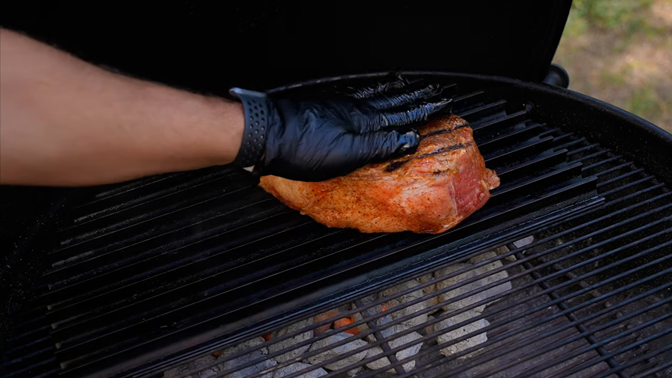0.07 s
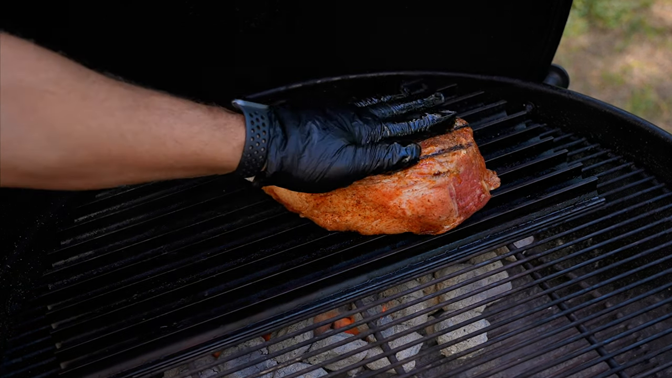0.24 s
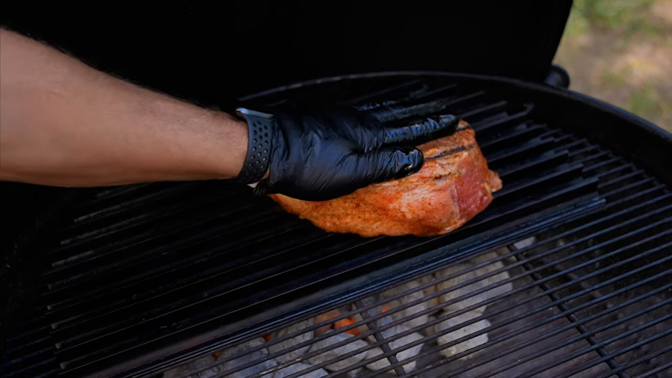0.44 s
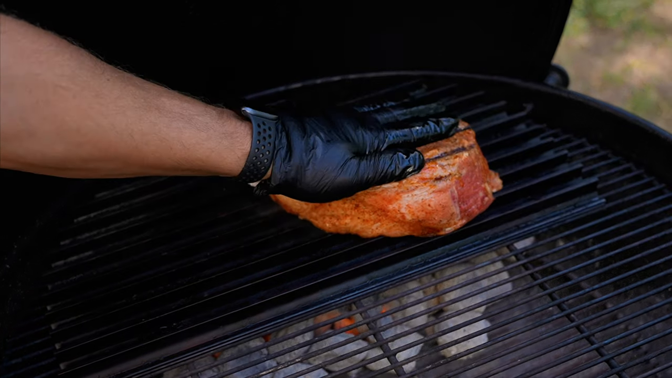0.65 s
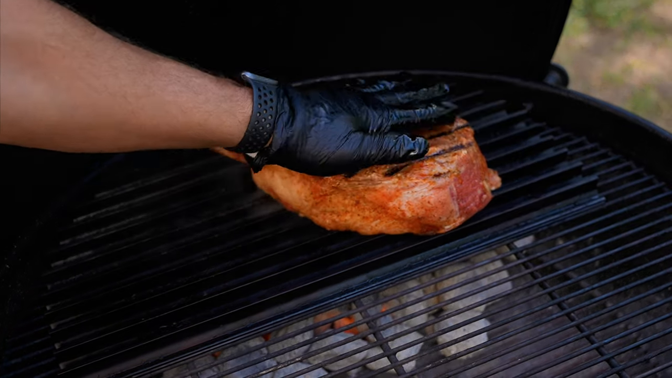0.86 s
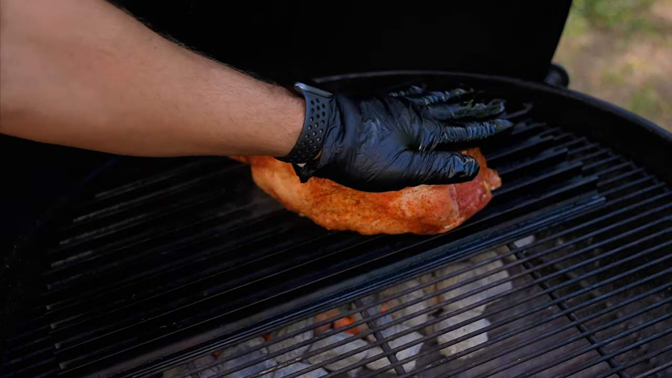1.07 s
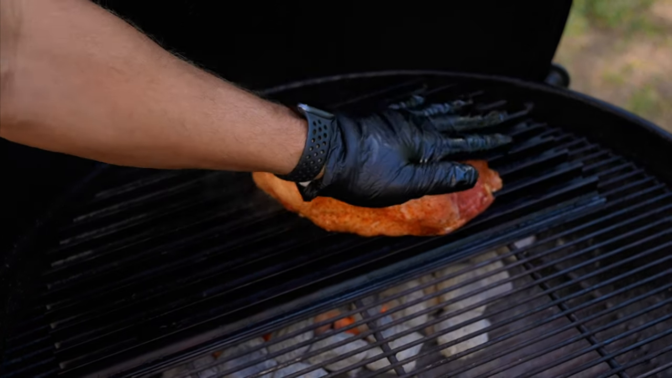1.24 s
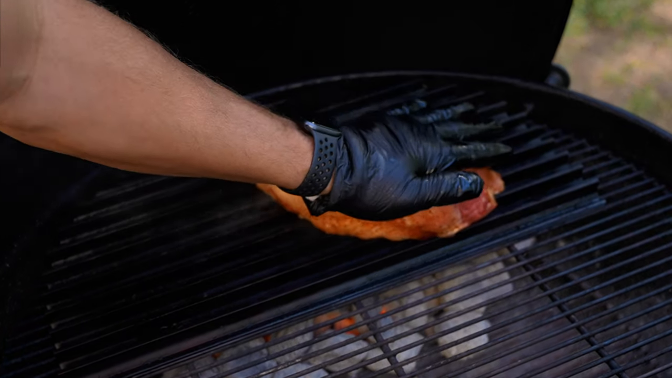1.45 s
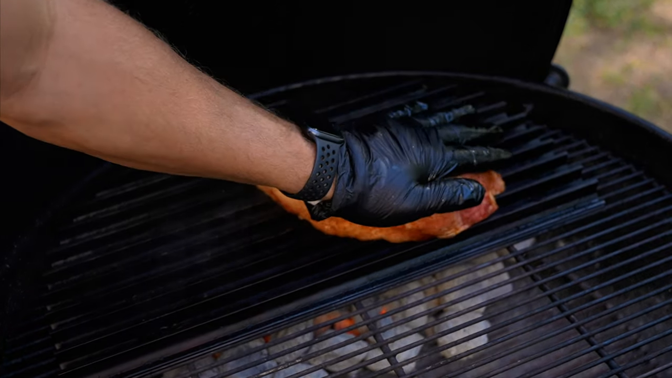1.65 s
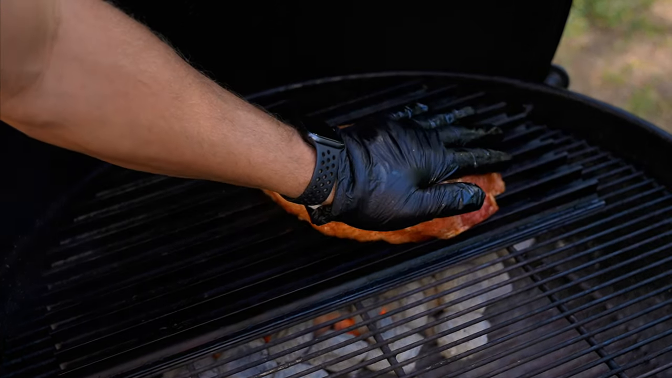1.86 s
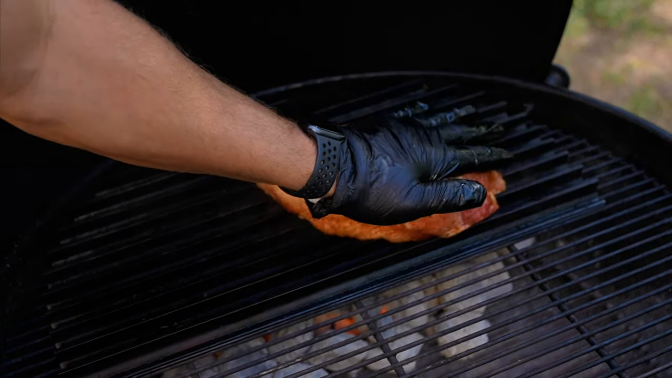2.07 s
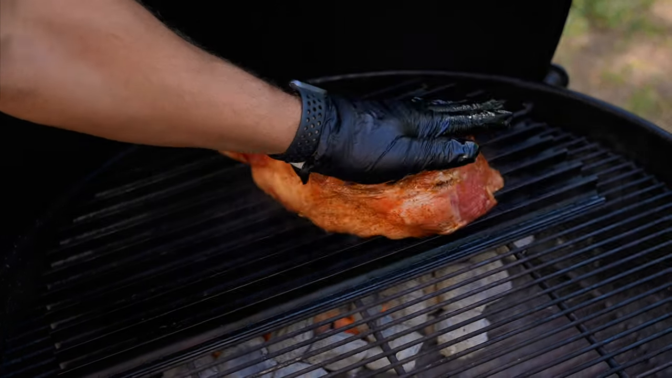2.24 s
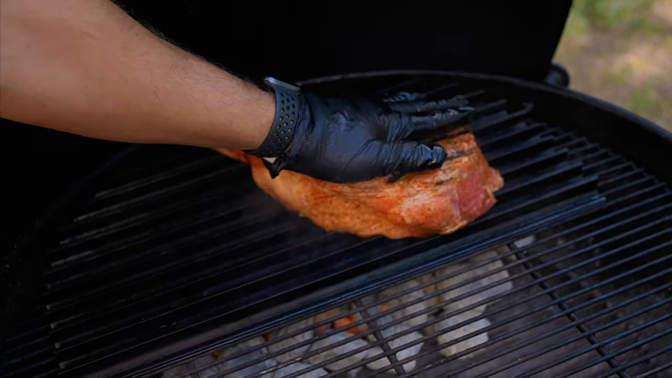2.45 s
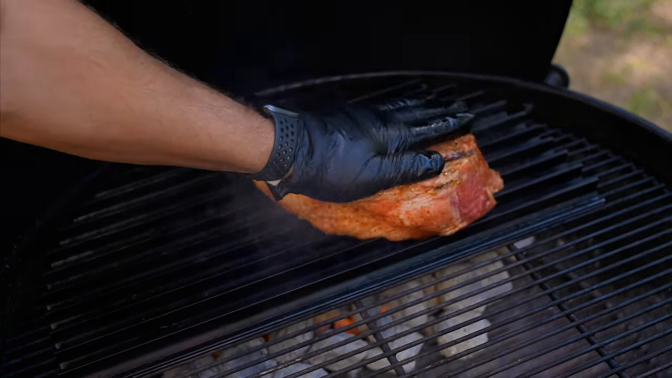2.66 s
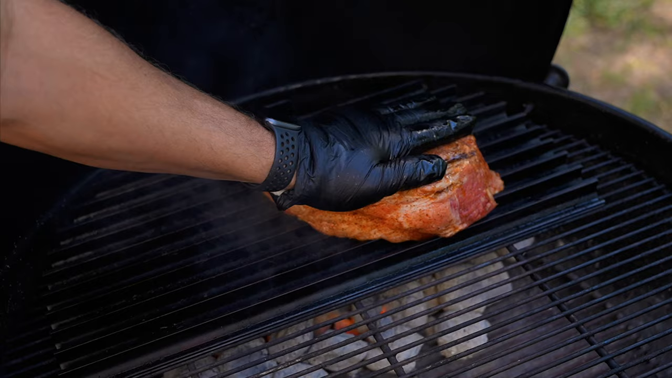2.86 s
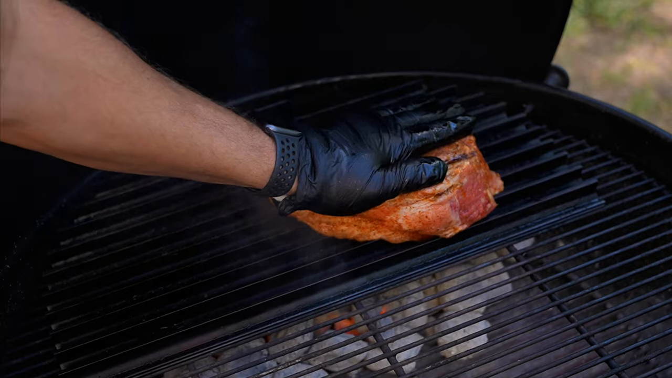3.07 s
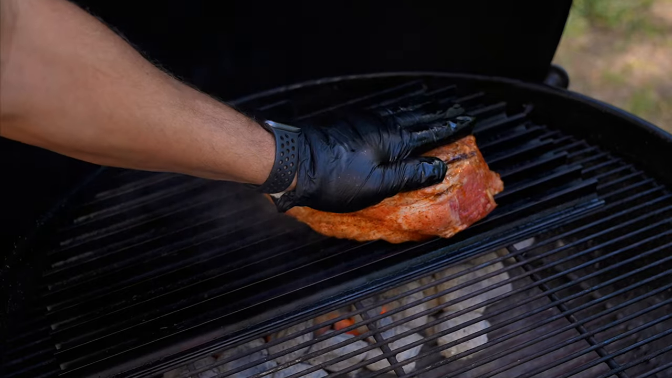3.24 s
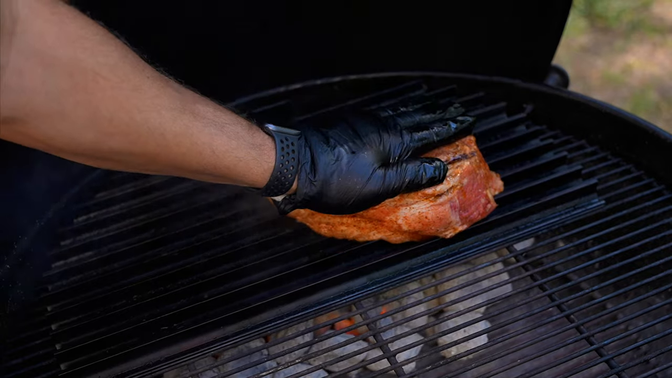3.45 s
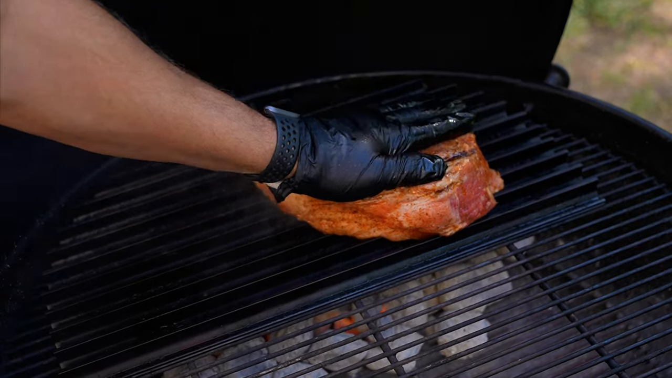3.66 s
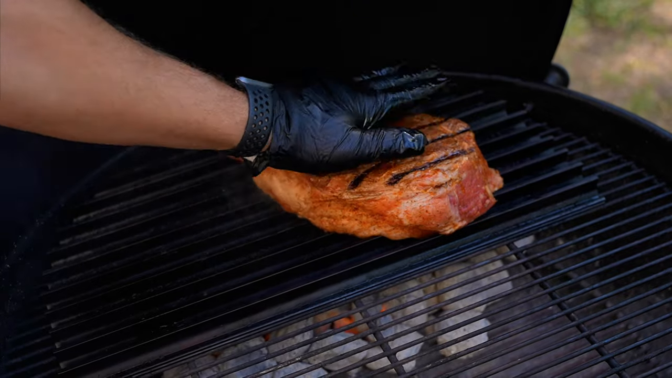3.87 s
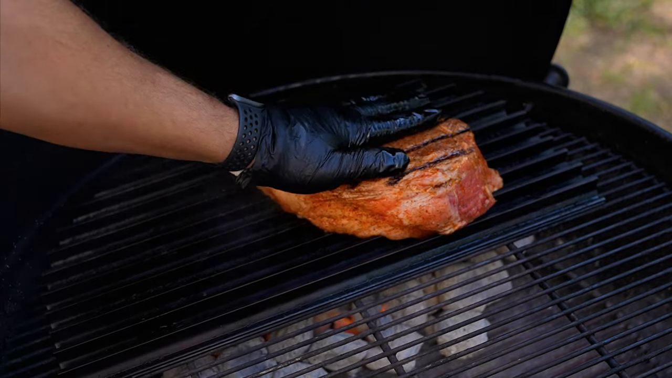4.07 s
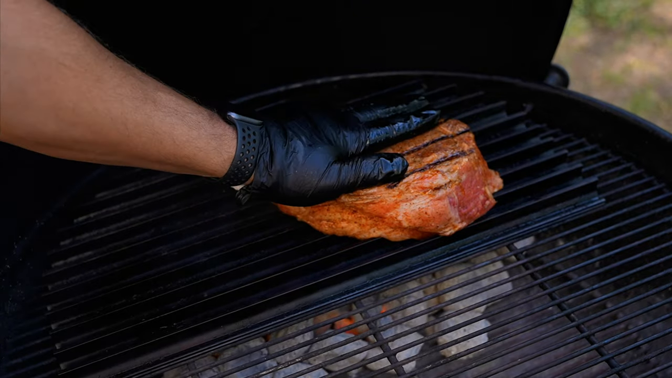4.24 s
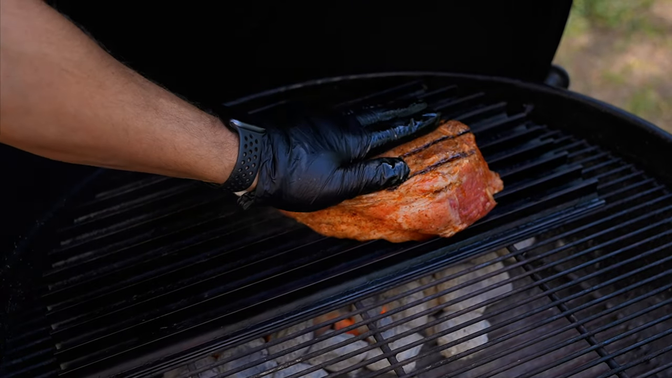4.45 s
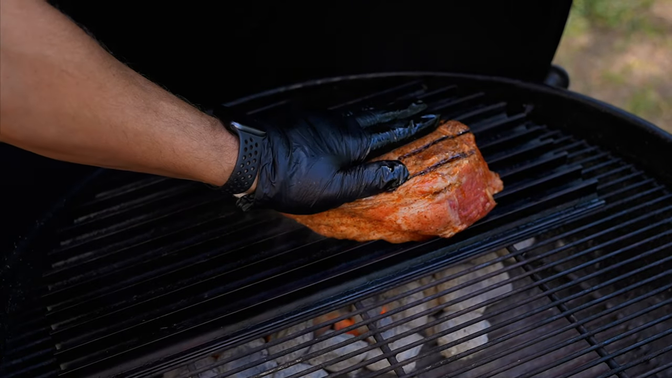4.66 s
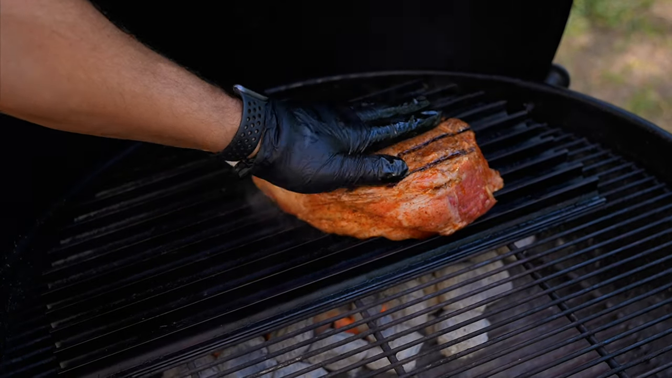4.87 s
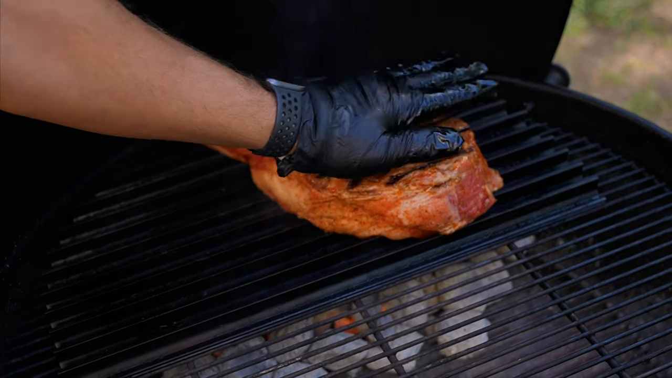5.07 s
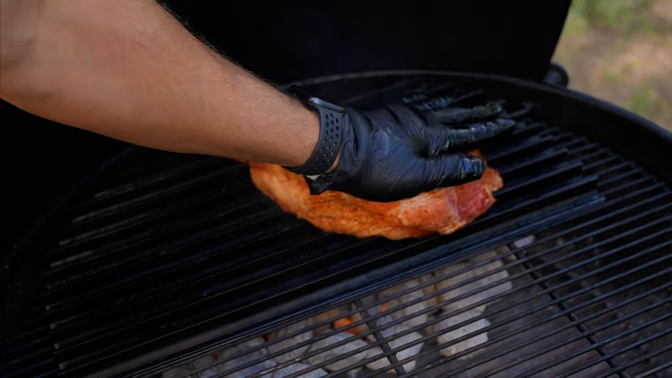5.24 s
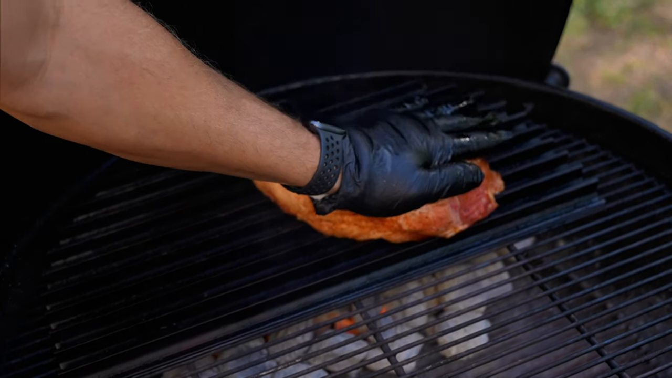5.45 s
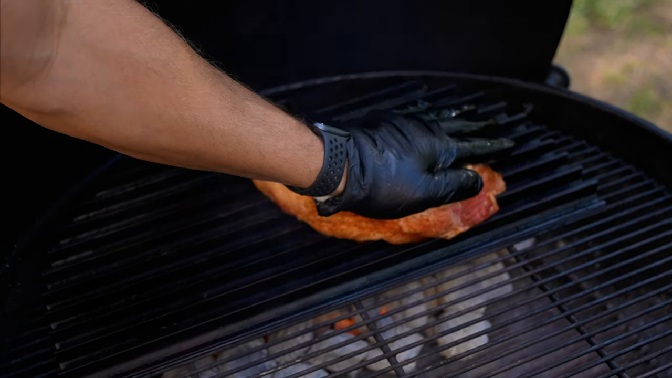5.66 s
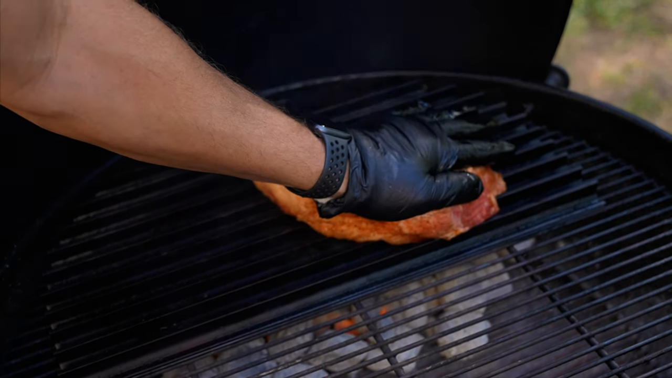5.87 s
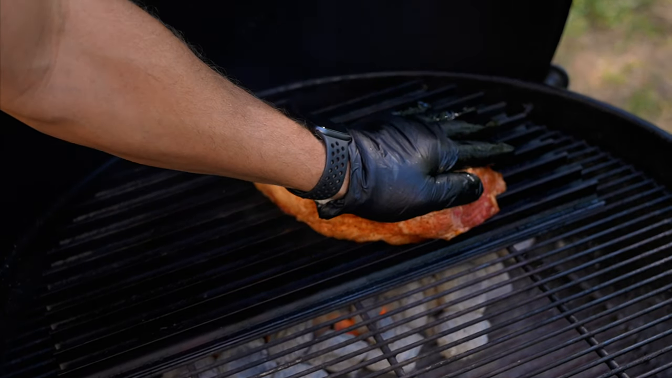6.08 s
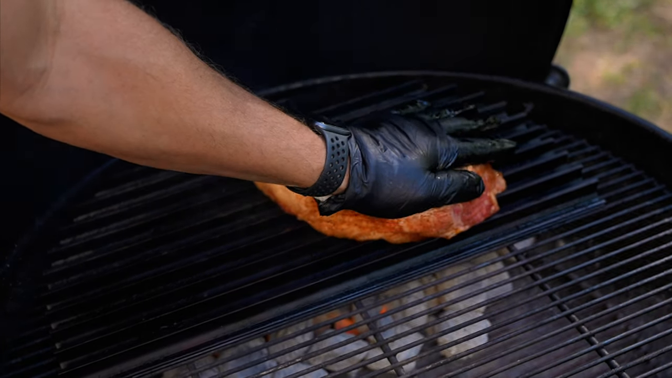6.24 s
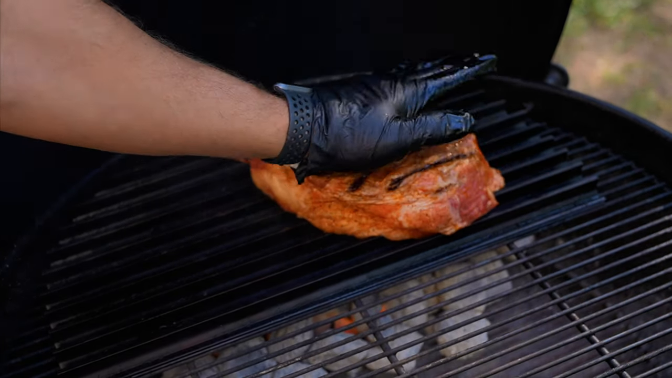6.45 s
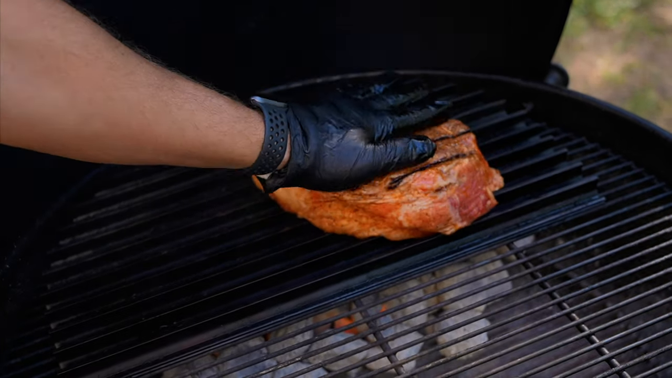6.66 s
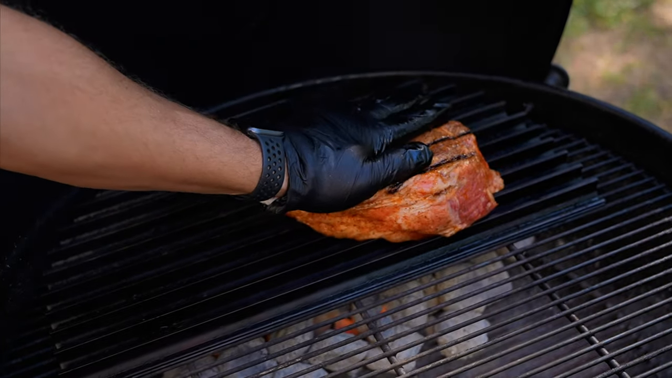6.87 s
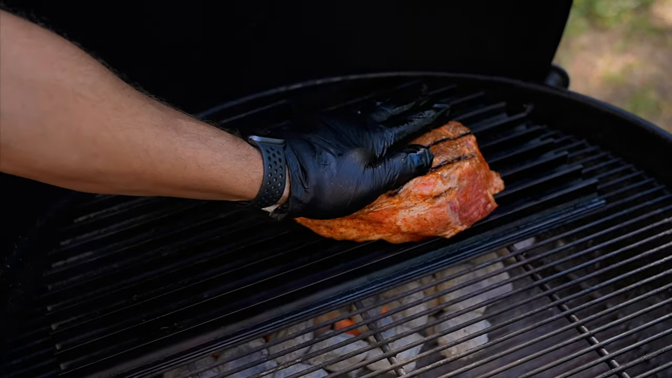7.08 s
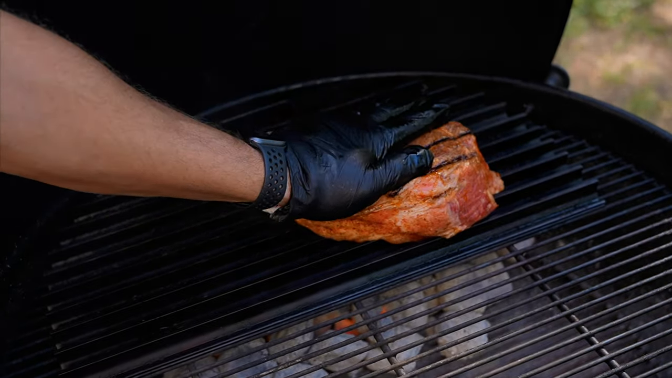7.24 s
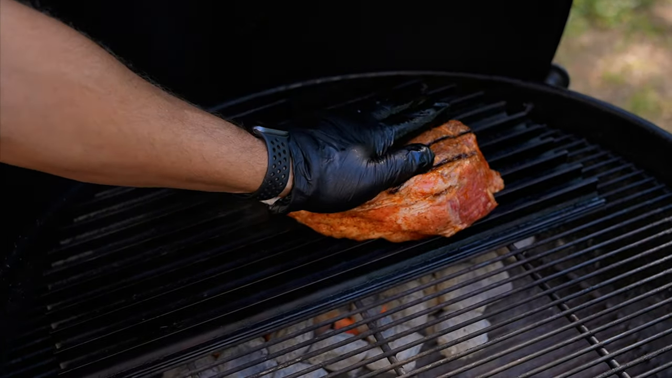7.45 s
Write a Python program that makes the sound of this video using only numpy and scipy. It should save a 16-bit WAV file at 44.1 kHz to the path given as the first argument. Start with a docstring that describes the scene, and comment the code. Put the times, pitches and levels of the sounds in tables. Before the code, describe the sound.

A thick steak sizzles on a hot charcoal grill, its bright hiss swelling with each press amid crackling fat pops and a faint outdoor rumble.

```python
"""A gloved hand presses a thick steak onto a hot charcoal grill, again and again, close to a mono microphone outdoors.
Juice flashes to steam on the bars: four sizes of tiny bursts, mixed with noise, make a hiss that swells with the presses.
Trapped steam sings in gliding narrow bands of noise, and one gap squeals in two resonances.
Drops of fat pop as a noise snap and a ring in two modes; droplets tick and the grate knocks as short decaying sines.
Under it lie a low filtered-noise rumble, distant resonant drones, and a light wind with puffs."""
import sys
import numpy as np
from scipy import signal
from scipy.fft import rfft, irfft, next_fast_len
from scipy.io import wavfile
from scipy.ndimage import uniform_filter1d, map_coordinates

SR = 44100
rng = np.random.default_rng(int(sys.argv[2]) if len(sys.argv) > 2 else 0)


def transcribe(signal):
    """Save signal, clipped to [-1, 1], as a 16-bit WAV file at the path in sys.argv[1]."""
    frames = np.atleast_2d(signal).T
    limited = np.clip(frames, -1, 1)
    pcm = np.round(limited * 32767).astype(np.int16)
    wavfile.write(sys.argv[1], SR, pcm)


N = 331099
TIME = np.arange(N) / SR  # seconds


def amp(db):
    """Level law: amplitude gain is 10 to the power dB / 20."""
    return 10 ** (np.asarray(db) / 20)


def unit(x):
    """Normalization: scale to an rms of 1."""
    return x / np.sqrt(np.mean(np.abs(x) ** 2) + 1e-20)


def curves(rows):
    """Linear interpolation: one value per sample for each column after the time."""
    times, *columns = np.transpose(rows)
    return [np.interp(TIME, times, column) for column in columns]


def wobble(rate_hz):
    """Slow random modulation: a spline through rate_hz random knots a second."""
    knots = rng.standard_normal(int(N * rate_hz / SR) + 4)
    return map_coordinates(knots, [TIME * rate_hz])


def coloured(x, outline):
    """Minimum-phase filtering: a causal filter with the given (hz, level_db) outline, output at rms 1."""
    size = 2 * next_fast_len(N)
    hz, level_db = np.transpose(outline)
    log_bins = np.log(np.fft.rfftfreq(size, 1 / SR) + 1)
    gain = amp(np.interp(log_bins, np.log(hz), level_db))
    # folding the cepstrum onto positive time makes the response causal
    cepstrum = irfft(np.log(gain))
    cepstrum[1:size // 2] *= 2
    cepstrum[size // 2 + 1:] = 0
    response = np.exp(rfft(cepstrum))
    return unit(irfft(rfft(x, size) * response, size)[:N])


def rings(rows):
    """Damped oscillation: each (start_s, level_db, pitch_hz, decay_s) swells quickly and dies away."""
    out = np.zeros(N + SR)
    t = np.arange(SR // 5) / SR
    for start_s, level_db, pitch_hz, decay_s in rows:
        age = 10 * t / decay_s  # the envelope peaks at age 1 and is about 60 dB down at age 10
        envelope = amp(level_db) * age * np.exp(1 - age)
        out[round(start_s * SR):][:len(t)] += envelope * np.sin(2 * np.pi * pitch_hz * t)
    return out[:N]


def resonance(pitch_hz, width_hz, skirt):
    """Resonance: rms-1 noise in a narrow band that follows a pitch curve; a larger skirt falls more steeply."""
    size = next_fast_len(N)
    noise = rng.standard_normal((2, size))
    offset_hz = np.fft.fftfreq(size, 1 / SR)
    shape = (1 + (2 * offset_hz / width_hz) ** 2 / skirt) ** (-skirt / 2)
    slow = np.fft.ifft((noise[0] + 1j * noise[1]) * shape)[:len(pitch_hz)]
    carrier = np.exp(2j * np.pi * np.cumsum(pitch_hz) / SR)
    return unit(np.real(slow * carrier))


def glide(start_s, end_s, from_hz, to_hz, width_hz, level_db, fade_s, skirt):
    """Gliding resonance: a noise-fed band moves in pitch and fades in and out over fade_s."""
    out = np.zeros(N)
    during = (TIME > start_s) & (TIME < end_s)
    t = TIME[during]
    to_edge_s = np.minimum(t - start_s, end_s - t)
    fade = np.sin(np.pi / 2 * np.clip(to_edge_s / fade_s, 0, 1))
    pitch_hz = np.interp(t, [start_s, end_s], [from_hz, to_hz])
    out[during] = amp(level_db) * fade * resonance(pitch_hz, width_hz, skirt)
    return out


# Bubble sizes, rows fizz, spray, sputter, simmer: rest_level_db, drying_fall [dB/s], press_sag [dB/s]
BUBBLES = [(-37.5, 0.58, 2.5), (-37.7, 1.5, 3), (-44, 0.32, 2), (-58, -0.4, 2)]
# Pushes of the hand: start_s, full_weight_s, let_go_s, dying_s [time to half amplitude],
# fizz_db, spray_db, sputter_db, simmer_db
PRESSES = [(-.2, 0.531, 0.69, .14, -29, -27.5, -34.5, -48),
           (1.164, 1.428, 2.13, 0.26, -34.5, -30.5, -37, -47.5),
           (1.494, 1.774, 1.98, 0.11, -34, -34.5, -42, -53), (2.38, 2.684, 3.58, 0.24, -35, -39, -41, -50),
           (3.846, 4.545, 4.704, 0.24, -34, -37, -40, -57.5),
           (5.34, 5.56, 5.85, 0.4, -37.5, -36.5, -38.5, -50.5),
           (5.753, 6.0, 6.28, .13, -34.5, -36.5, -44.5, -63),
           (6.763, 6.903, 7.48, .1, -39.5, -41, -44.5, -58.5),
           (7.048, 7.368, 7.46, 0.044, -36.5, -41, -45, -66)]


def boiling():
    """Power summation: each bubble size has a drifting rest level plus presses that rise, sag and die away."""
    gains = []
    for size, (rest_db, drying, sag) in enumerate(BUBBLES):
        power = amp(rest_db - drying * TIME) ** 2
        for start_s, full_s, let_go_s, dying_s, *levels_db in PRESSES:
            rise = np.clip((TIME - start_s) / (full_s - start_s), 0, 1)
            hold = amp(levels_db[size] - sag * np.maximum(TIME - full_s, 0))
            release = 1 / (1 + (np.maximum(TIME - let_go_s, 0) / dying_s) ** 2)
            power = power + (rise * hold * release) ** 2
        gains.append(np.sqrt(power))
    return gains


def bursts(colour, rate, spread_db, steam_db, flutter_db):
    """Shot noise: random bursts of uneven size, mixed with steam noise and fluttering in level."""
    happens = rng.random(N) < rate / SR  # rate is in bursts a second
    sizes = amp(spread_db * np.minimum(rng.standard_normal(N), 2)) * rng.choice([-1, 1], N)
    impulses = unit(happens * sizes / np.sqrt(rate))  # a denser crowd has smaller bursts
    steam_bed = amp(steam_db) * rng.standard_normal(N)
    flutter = amp(flutter_db * unit(wobble(25) + wobble(120)))
    return unit(coloured(impulses + steam_bed, colour) * flutter)


def patchy(x, depth_db):
    """Time-frequency modulation: each spot of the meat boils up in its own band and fades again."""
    spectrum = signal.stft(x, nperseg=512)[2]
    field = rng.standard_normal(spectrum.shape)
    field = uniform_filter1d(field, size=5, axis=0)  # smooth over frequency
    field = uniform_filter1d(field, size=24, axis=1)  # smooth over time
    return unit(signal.istft(spectrum * amp(depth_db * unit(field)), nperseg=512)[1][:N])


# Hollow resonances of the grill bowl: pitch_hz, width_hz, lift_db
BOWL = [(1113, 33, 6.5), (1275, 36, 4), (1484, 47, 5), (1753, 120, 3.5), (2060, 160, 1.5), (2803, 160, 2.5),
        (3750, 250, 1), (4500, 300, -0.5)]


def bowl(x):
    """Cavity resonance: the grill bowl reshapes a few bands of the sound that passes through it."""
    size = next_fast_len(N + SR // 2)
    f = np.fft.rfftfreq(size, 1 / SR)
    lift = 0
    for hz, width_hz, lift_db in BOWL:
        damping = 1j * f * width_hz
        lift = lift + (amp(lift_db) - 1) * damping / (hz * hz - f * f + damping)
    return unit(irfft(rfft(x, size) * (1 + lift), size)[:N])


# Spectral outlines of the four bubble sizes: pitch_hz, level_db [relative dB per Hz]
FIZZ_COLOUR = [(3500, -39.5), (5500, -20), (7000, -11.5), (8000, -6), (8800, -1.5), (10200, 0.5),
               (11300, -2), (12500, -8.5), (14500, -8.5), (16000, -14)]
SPRAY_COLOUR = [(3000, -37), (5500, -12), (6600, -9.5), (8500, -10.5), (10500, -6), (12500, -1),
                (14000, -4), (16000, -6)]
SPUTTER_COLOUR = [(300, -22), (900, -14.5), (1850, -12.5), (2080, -1.5), (2800, 0), (3600, 0.5), (4100, 0),
                  (4700, 0), (5400, -5), (6500, -12), (9000, -17.5)]
SIMMER_COLOUR = [(200, -8), (500, -11.5), (900, -1), (1150, -2), (1300, 2.5), (1550, -2), (1900, -1.5),
                 (2600, -9.5)]


def sizzle():
    """Bubble acoustics: four sizes burst on the bars; the smaller they are, the higher and denser they sound."""
    fizz_gain, spray_gain, sputter_gain, simmer_gain = boiling()
    crowd = (fizz_gain / np.median(fizz_gain)) ** 1.2  # harder boiling means more bursts a second
    fizz = bursts(FIZZ_COLOUR, rate=6000 * crowd, spread_db=2.5, steam_db=-2, flutter_db=0.62)
    spray = bursts(SPRAY_COLOUR, rate=4000 * crowd, spread_db=4.5, steam_db=1.5, flutter_db=0.3)
    sputter = bursts(SPUTTER_COLOUR, rate=2500 * crowd, spread_db=3.5, steam_db=1.0, flutter_db=0.71)
    simmer = bursts(SIMMER_COLOUR, rate=700 * crowd, spread_db=5.5, steam_db=-1, flutter_db=1.9)
    fizz, spray = patchy(fizz, depth_db=2.0), patchy(spray, depth_db=2.3)
    sputter, simmer = patchy(sputter, depth_db=0.64), patchy(simmer, depth_db=-0.1)

    waves = amp(0.58 * wobble(13))  # the finest bubbles come in waves
    bright = (fizz_gain * fizz + spray_gain * spray) * waves
    hollow = sputter_gain * bowl(sputter) + simmer_gain * bowl(simmer)
    surge = amp(0.27 * wobble(32))  # fresh juice reaches all of them at once
    return (bright + hollow) * surge


# Spectral outlines of the outdoor rumble and of the wind: pitch_hz, level_db [relative dB per Hz]
AIR_COLOUR = [(25, -28), (50, -20), (72, 0.5), (115, 1.5), (150, -3), (178, -5), (205, -11), (260, -12.5),
              (400, -15.5), (500, -13.5), (700, -15.5), (1200, -20.5), (4000, -28), (16000, -49)]
GUST_COLOUR = [(18, -19), (30, -16), (45, -8), (65, -1), (85, -7.5), (130, -17.5), (300, -37), (1000, -70)]
# Puffs of wind: centre_s, half_length_s, level_db
GUSTS = [(.68, 0.25, -55), (1.397, .1, -47.5), (2.1, 0.19, -54), (2.93, 0.092, -51), (3.36, .06, -45.5),
         (4.83, 0.076, -49), (6.58, .1, -57), (6.9, .06, -51)]
# Distant droning: start_s, end_s, from_hz, to_hz, width_hz, level_db
DRONES = [(-.1, .35, 161, 173, 7.8, -52), (2.499, 3.9, 120, 120, 6.5, -55),
          (4.2, 4.95, 119, 119, 6.4, -56.5), (-.5, 4.84, 472, 472, 5.5, -72), (5.6, 7.4, 366, 324, 14, -68),
          (5.6, 8.1, 716, 706, 24, -63.5)]
RUMBLE_DB, BREEZE_DB = -50.3, -60.5  # middle levels, about which each one wavers
DRONE_FADE_S = 0.085


def outdoors():
    """Broadband and resonant noise: a low rumble with distant drones, and a breeze with puffs of wind."""
    rumble_gain = amp(RUMBLE_DB + 1.3 * wobble(7))
    rumble = rumble_gain * coloured(rng.standard_normal(N), AIR_COLOUR)
    breeze_gain = amp(BREEZE_DB + 2.5 * wobble(5.4))
    puffs = sum(amp(db) * np.exp(-((TIME - s) / half_s) ** 2) for s, half_s, db in GUSTS)
    wind_gain = np.hypot(breeze_gain, puffs)  # powers add
    wind = wind_gain * coloured(rng.standard_normal(N), GUST_COLOUR)
    drones = sum(glide(*drone, DRONE_FADE_S, skirt=1.3) for drone in DRONES)
    return rumble + wind + drones


def spits(rate, peak_db, spread_db, centre_hz, decay_s):
    """Random impacts: stray droplets tick on the hot bars, whether or not the hand presses."""
    rows = []
    for when, size, turn in rng.random((round(rate * N / SR), 3)):
        level_db = peak_db - spread_db * np.sqrt(size)
        octaves = .22 * np.sqrt(2) * np.sin(2 * np.pi * turn)
        rows.append((when * N / SR, level_db, centre_hz * 2 ** octaves, decay_s))
    return rings(rows)


# Steam escaping through gaps: start_s, end_s, from_hz, to_hz, level_db
JETS = [(0.124, 0.802, 10750, 10540, -45), (0.107, 0.744, 6480, 6680, -44), (.15, 0.852, 2750, 2800, -54),
        (1.349, 1.952, 2295, 2417, -47.5), (1.75, 2.251, 4020, 4350, -44), (2.023, 2.32, 10500, 10230, -39),
        (2.65, 3.744, 2333, 2247, -46.5), (2.682, 3.699, 1266, 1192, -55.5),
        (3.949, 4.602, 8830, 8400, -43), (4.196, 5.03, 1122, 1159, -58.5), (4.502, 5.05, 2250, 2280, -49.5),
        (4.585, 4.95, 9110, 9300, -49), (6.82, 7.501, 4400, 4500, -47), (7.201, 7.582, 3460, 3360, -47.5),
        (4.162, 4.501, 3400, 3540, -49), (6.982, 7.4, 1138, 1125, -57.5), (7.274, 7.584, 9600, 9400, -39.5)]
JET_WIDTH_HZ, JET_WIDENS = 144, 0.58  # width of a jet at 1 kHz; the power of pitch by which it grows
JET_FADE_S = 0.072


def steam():
    """Jet resonance: trapped steam sings as the gap that it escapes through changes; higher jets are wider."""
    out = np.zeros(N)
    for start_s, end_s, from_hz, to_hz, level_db in JETS:
        width_hz = JET_WIDTH_HZ * (from_hz / 1000) ** JET_WIDENS
        out += glide(start_s, end_s, from_hz, to_hz, width_hz, level_db, JET_FADE_S, skirt=2.6)
    return out


# Drops of fat bursting: start_s, ring_level_db [envelope peak], pitch_hz, decay_s [to about -60 dB], snap_level_db
POPS = [(1.9448, -25, 1010, 0.0051, -25), (2.562, -37, 1530, 0.0053, -28),
        (4.9491, -25.5, 1180, 0.011, -27), (5.143, -42, 2500, .004, -20), (5.239, -34, 2500, .0062, -23),
        (5.3087, -32, 3140, .006, -20), (5.553, -32.5, 1100, .0027, -29), (5.6575, -24, 1880, 0.0033, -26),
        (5.8185, -29, 1170, 0.0048, -26), (6.29, -40, 3520, 0.0019, -23), (7.067, -29, 1500, 0.0024, -36),
        (7.222, -35.5, 1100, 0.012, -38), (7.276, -22, 3150, 0.0018, -25)]
# Spectral outline of the snap: pitch_hz, level_db [relative dB per Hz]
SNAP_COLOUR = [(400, -20), (3000, -17), (7000, -20), (10500, 6), (13000, 6), (16000, -5)]
SNAP_T60_S = 0.008
# a drop's second mode: pitch, level and decay time against the first
OVERTONE_RATIO, OVERTONE_DB, OVERTONE_LIFE = 2.05, -1, 0.63


def pops():
    """Modal ringing: a drop of fat tears open with a bright snap, and its cavity rings in two modes."""
    modes = []
    snap_gain = np.zeros(N)
    for start_s, ring_db, pitch_hz, decay_s, snap_db in POPS:
        modes.append((start_s, ring_db, pitch_hz, decay_s))
        modes.append((start_s, ring_db + OVERTONE_DB, pitch_hz * OVERTONE_RATIO, decay_s * OVERTONE_LIFE))
        fall_db = 60 * np.clip((TIME - start_s) / SNAP_T60_S, 0, 2)
        snap_gain += (TIME >= start_s) * amp(snap_db - fall_db)
    snaps = snap_gain * coloured(rng.standard_normal(N), SNAP_COLOUR)
    return rings(modes) + snaps


# The squealing gap: time_s, lower_hz, upper_hz, level_db [lower resonance]
SQUEAL = [(5.76, 3850, 4450, -52), (5.9, 3700, 4400, -40.5), (6.05, 3690, 4370, -39.5),
          (6.16, 3790, 4480, -41.5), (6.24, 4120, 4610, -40), (6.31, 4620, 5000, -37.5),
          (6.36, 4450, 5000, -50)]
SQUEAL_WIDTH_HZ, SQUEAL_UPPER_DB = 250, -1.5  # width of both; upper resonance against the lower


def squeal():
    """Coupled pitch glide: two resonances of one gap dip, then climb as the hand squeezes it shut."""
    lower_hz, upper_hz, level_db = curves(SQUEAL)
    gain = amp(level_db) * (TIME > SQUEAL[0][0]) * (TIME < SQUEAL[-1][0])
    lower = resonance(lower_hz, SQUEAL_WIDTH_HZ, skirt=2.2)
    upper = resonance(upper_hz, SQUEAL_WIDTH_HZ, skirt=2.2)
    return gain * (lower + amp(SQUEAL_UPPER_DB) * upper)


# The grate knocking dully: start_s, level_db [envelope peak], pitch_hz, decay_s [to about -60 dB]
KNOCKS = [(6.790, -46, 140, 0.055), (6.830, -35.5, 163, 0.061)]


def knocks():
    """Damped oscillation: the grate knocks under the hand as low, short rings."""
    return rings(KNOCKS)


def scene():
    """Superposition: all sources add at one microphone, heard alike in both ears."""
    ticks = spits(rate=21, peak_db=-16.5, spread_db=11, centre_hz=10800, decay_s=0.00077)
    mono = sizzle() + outdoors() + ticks + steam() + pops() + squeal() + knocks()
    return np.array([mono, mono])


TOP_HZ = 15750


def record(dry):
    """Band limiting: the recorder keeps nothing at or above TOP_HZ."""
    size = next_fast_len(N + SR // 2)
    passed = np.fft.rfftfreq(size, 1 / SR) < TOP_HZ
    return irfft(rfft(dry, size) * passed, size)[:, :N]


dry = scene()
out = record(dry)
transcribe(out)
```